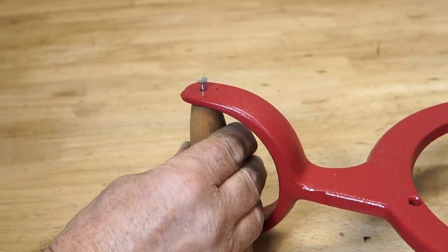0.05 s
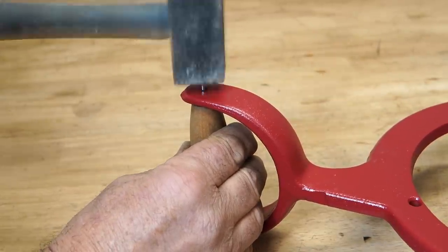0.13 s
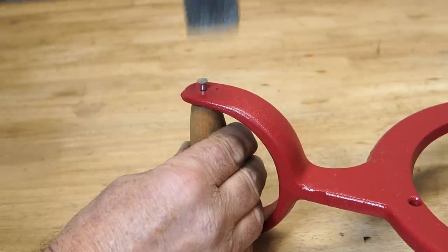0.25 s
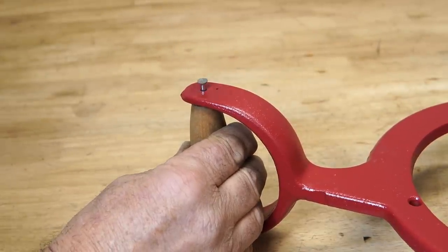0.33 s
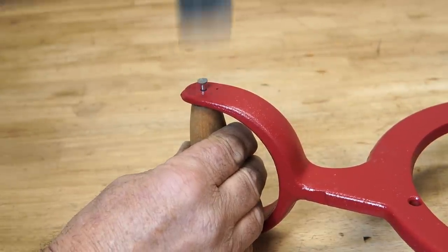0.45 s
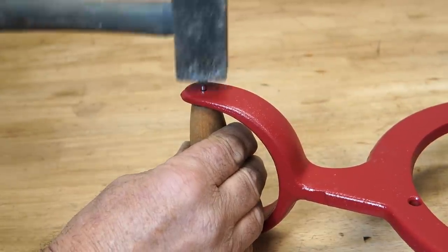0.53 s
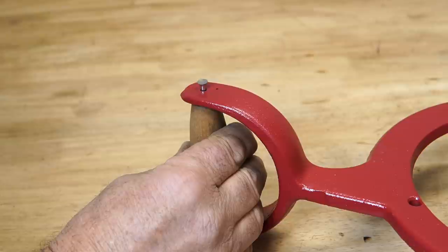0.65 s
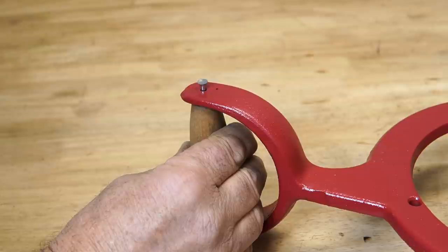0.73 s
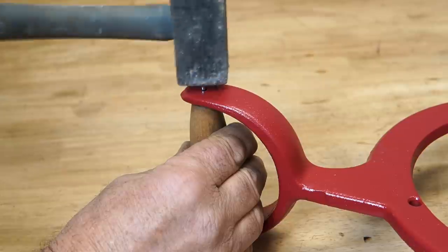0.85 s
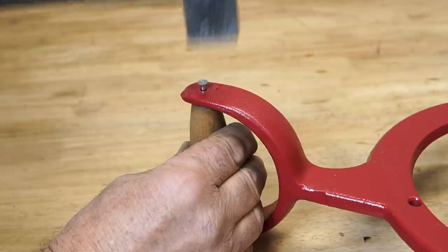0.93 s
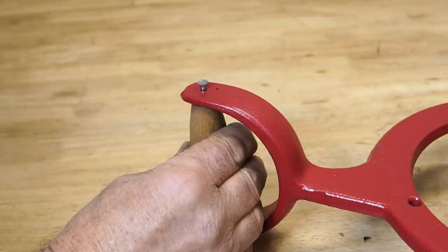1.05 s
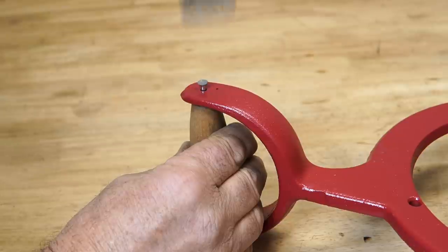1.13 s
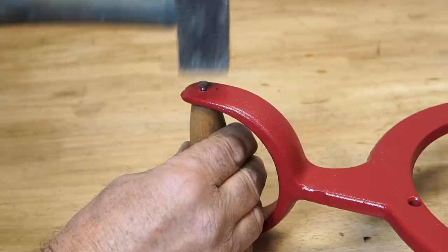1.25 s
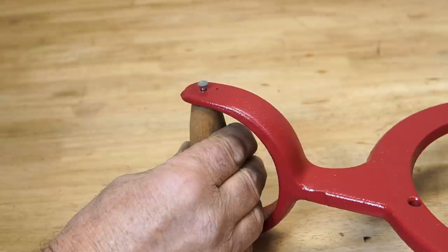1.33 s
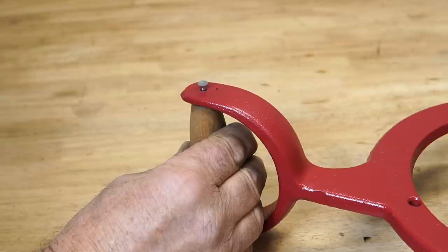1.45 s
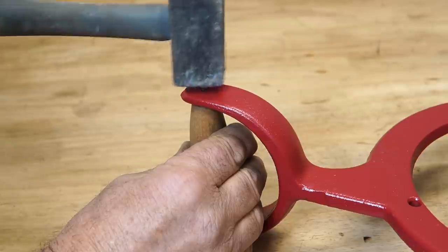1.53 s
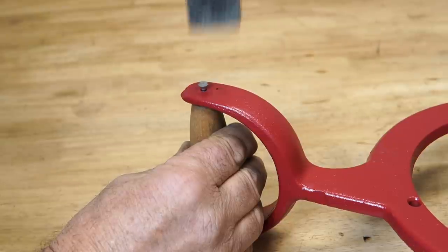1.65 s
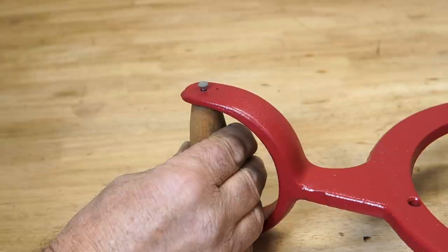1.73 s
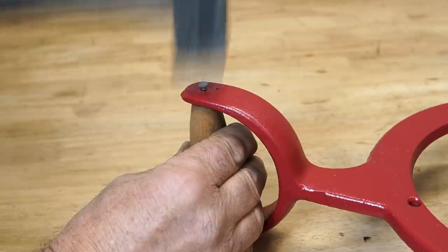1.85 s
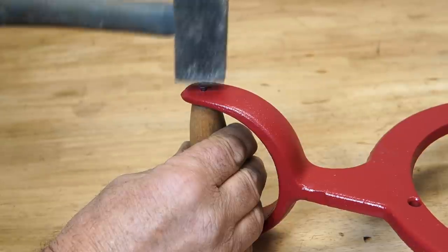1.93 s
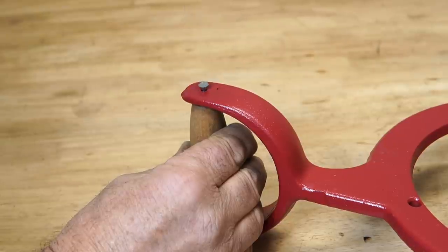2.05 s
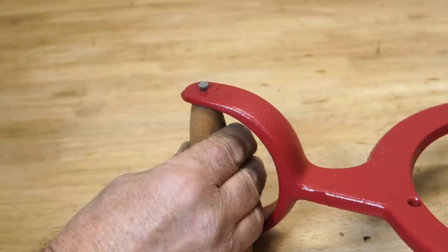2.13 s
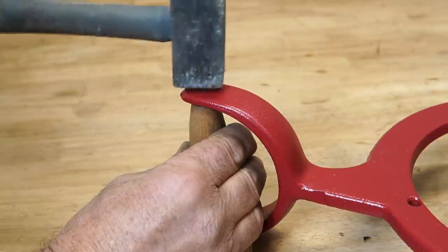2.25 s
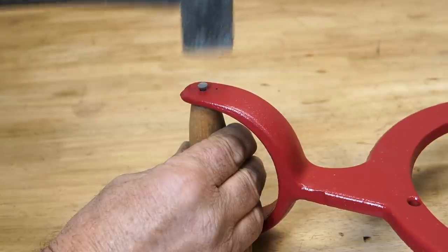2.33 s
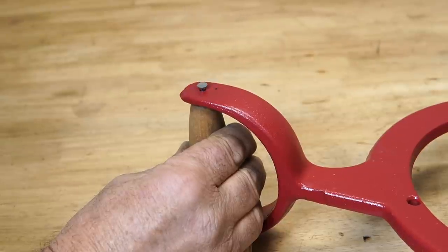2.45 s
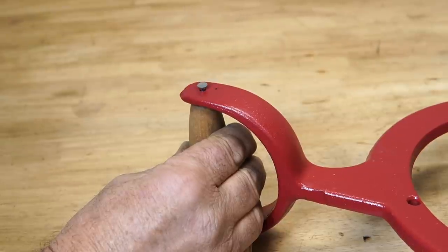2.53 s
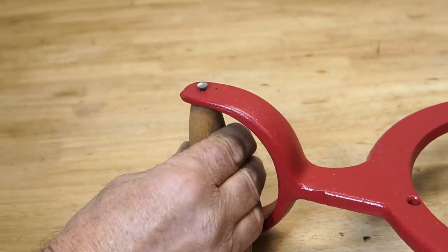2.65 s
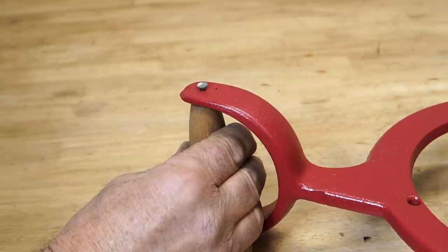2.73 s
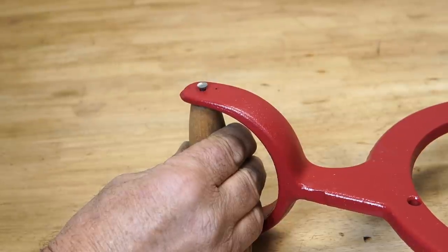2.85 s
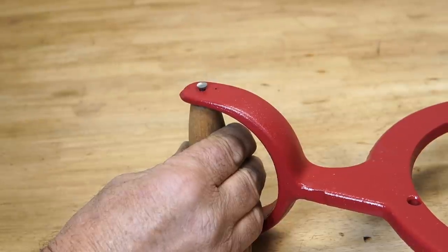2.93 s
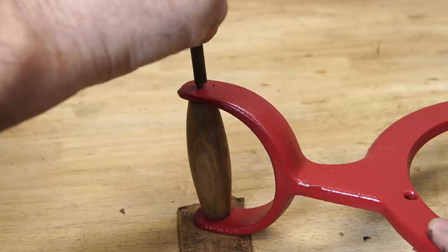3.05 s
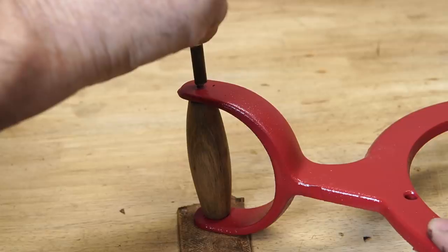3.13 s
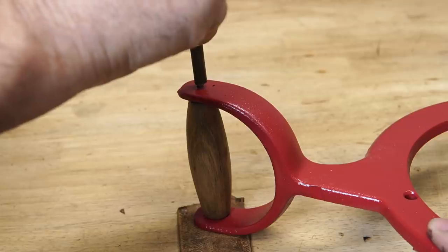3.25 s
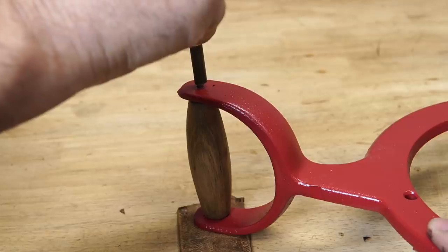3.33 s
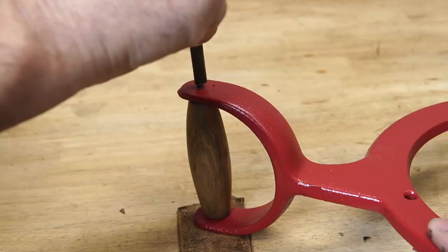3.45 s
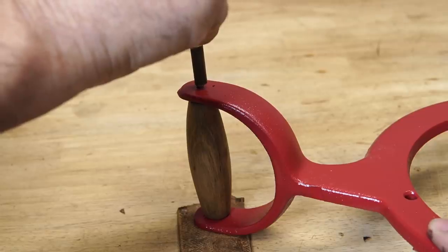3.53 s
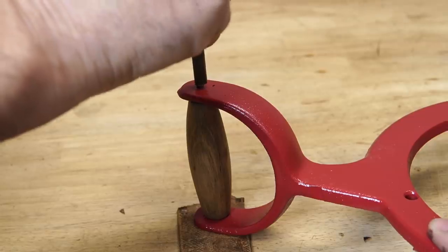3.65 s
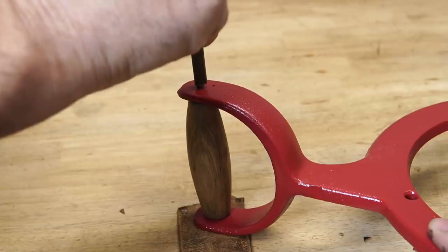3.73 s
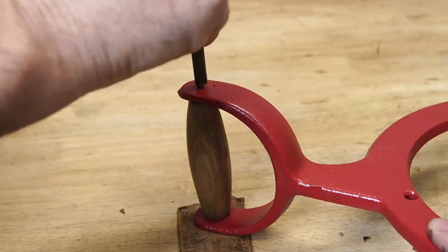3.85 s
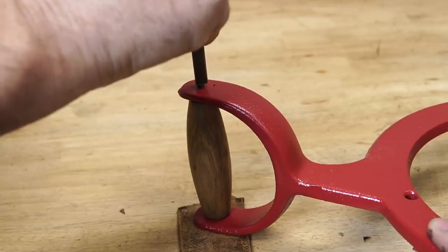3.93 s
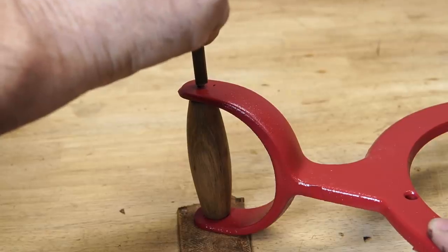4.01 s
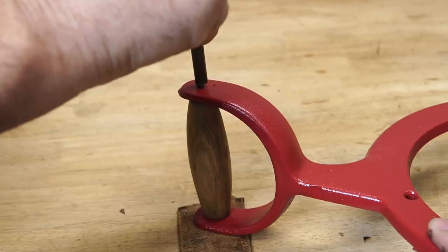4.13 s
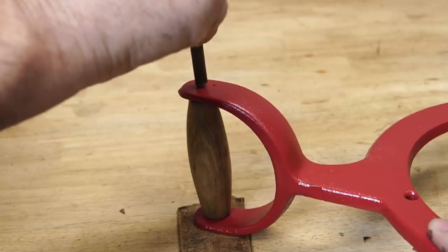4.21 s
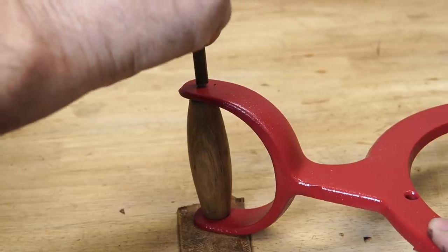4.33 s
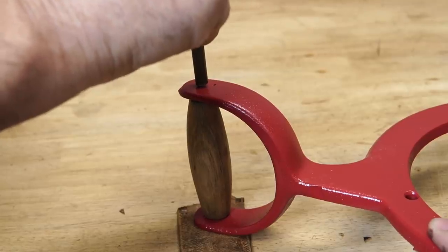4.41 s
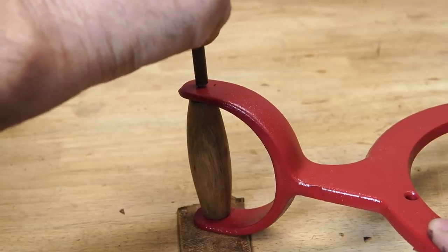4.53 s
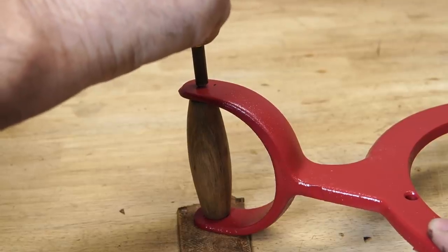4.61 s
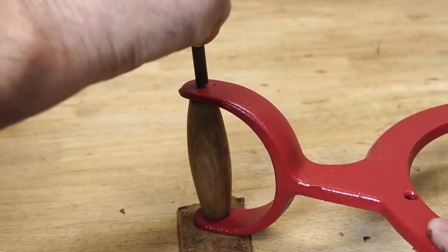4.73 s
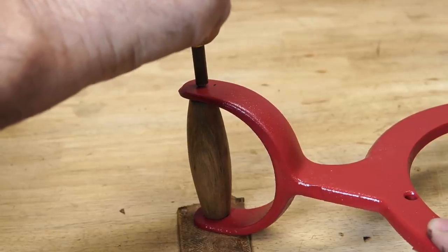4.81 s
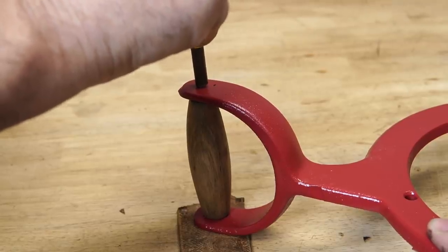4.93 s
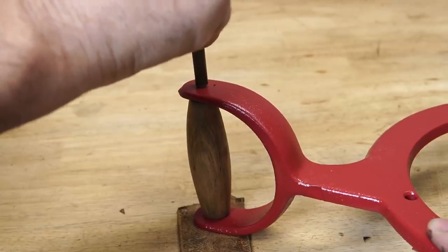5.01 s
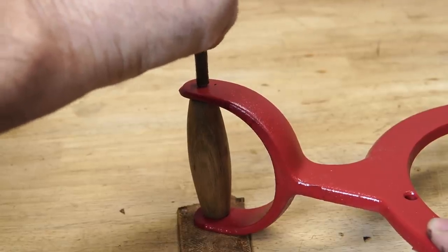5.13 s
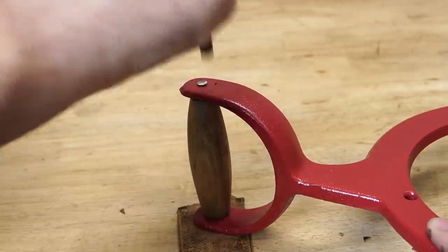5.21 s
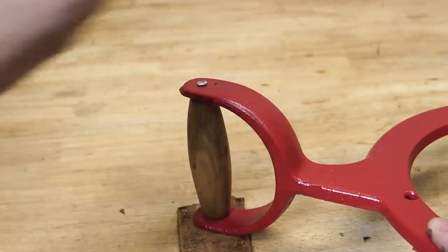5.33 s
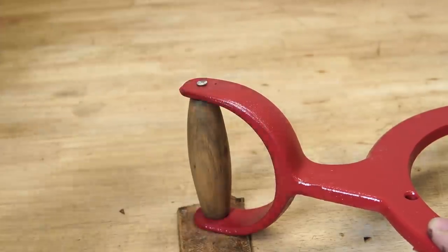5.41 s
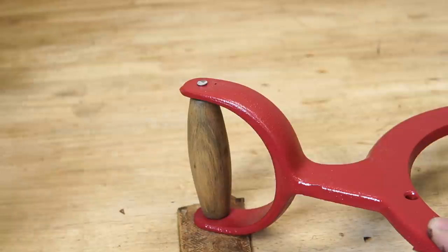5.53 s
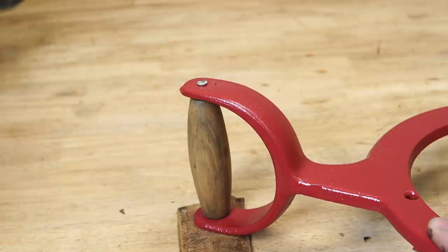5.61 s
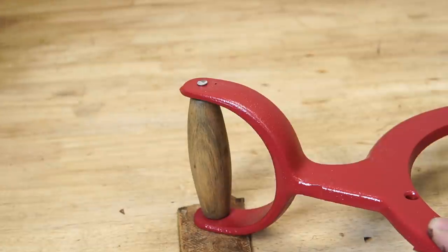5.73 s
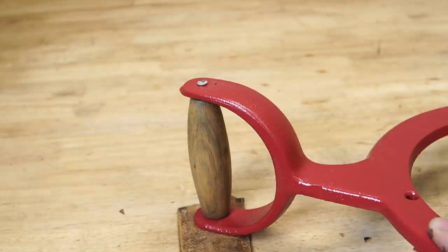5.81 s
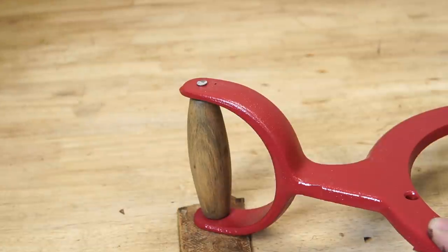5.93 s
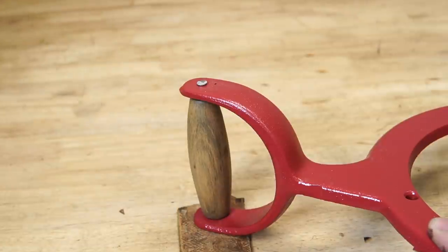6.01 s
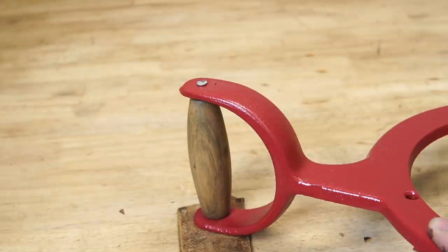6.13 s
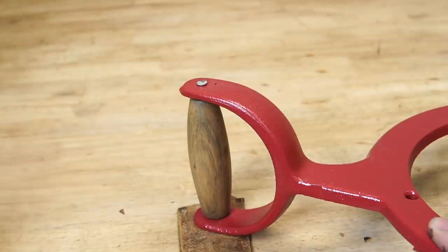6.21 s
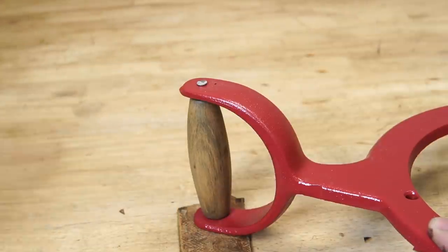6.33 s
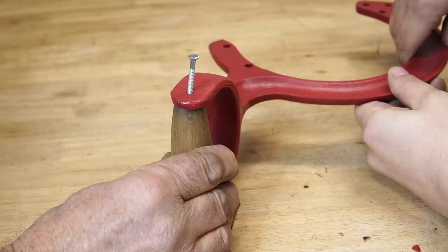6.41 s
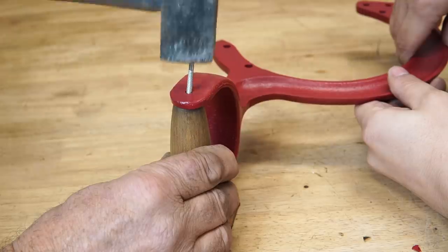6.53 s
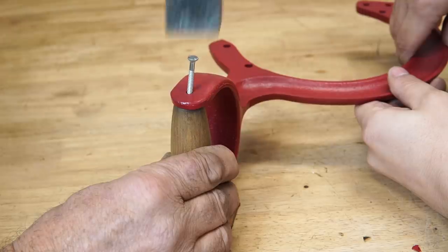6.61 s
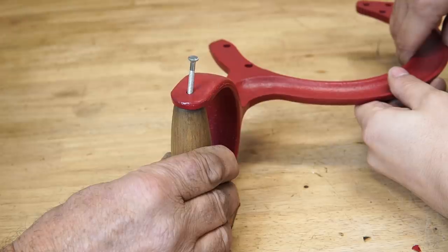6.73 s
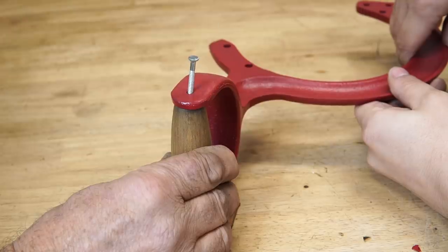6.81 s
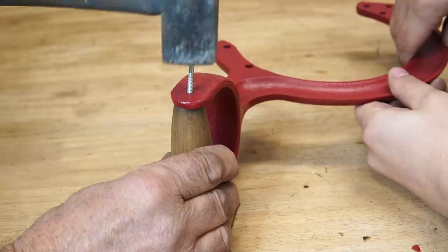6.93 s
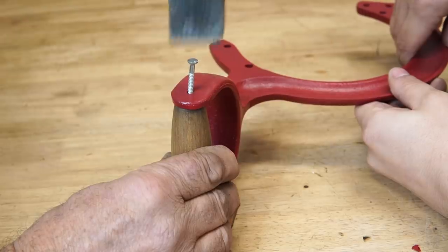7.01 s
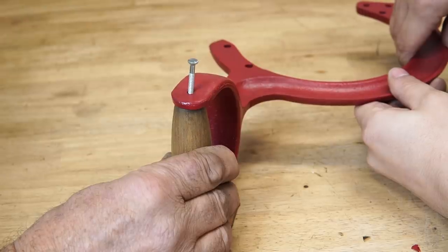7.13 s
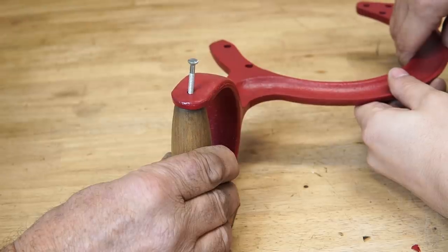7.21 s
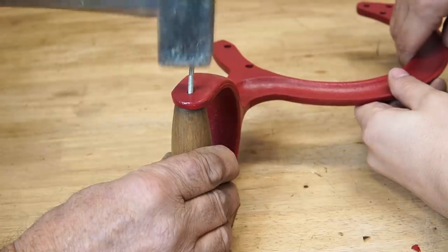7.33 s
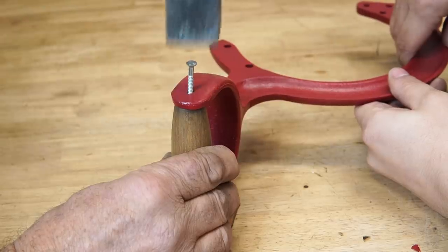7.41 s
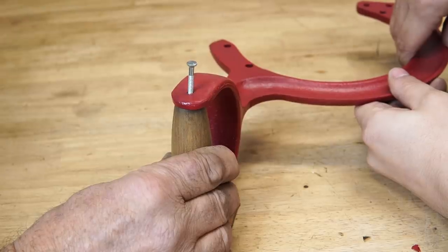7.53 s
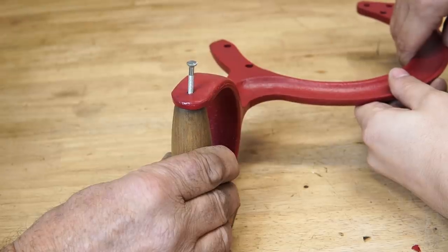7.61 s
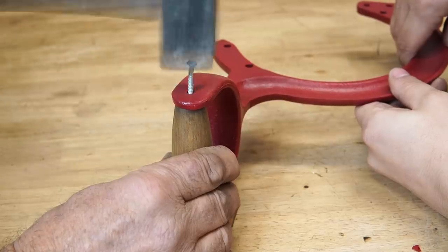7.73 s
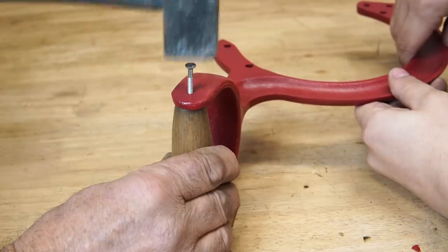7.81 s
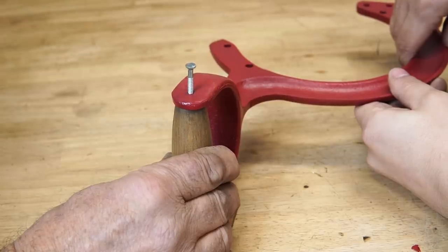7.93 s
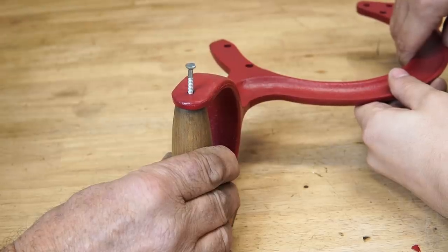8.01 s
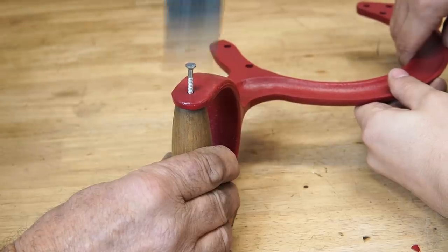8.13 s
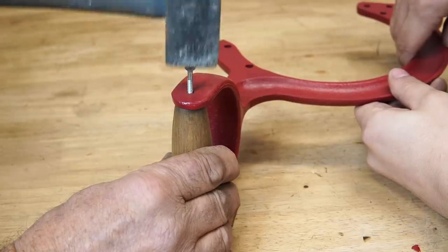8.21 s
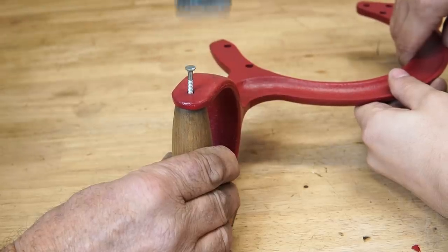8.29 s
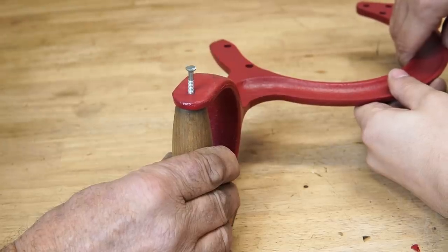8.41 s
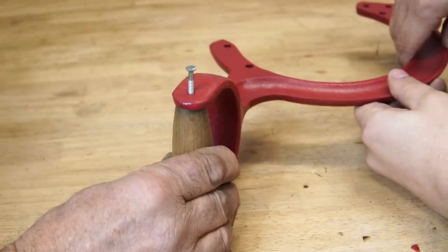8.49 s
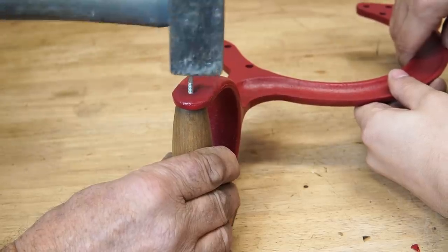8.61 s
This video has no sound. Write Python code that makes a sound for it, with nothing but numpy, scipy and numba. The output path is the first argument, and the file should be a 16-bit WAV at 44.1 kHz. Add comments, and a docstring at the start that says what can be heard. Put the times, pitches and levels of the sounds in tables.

```python
"""In a bare, echoing workshop, a hammer drives pins into a cast handle on a wooden bench.
First come blows on a pin, then heavy blows and light taps through a punch and knocks of the handle
on the bench, then blows on a second pin. Each of these three parts opens in an earlier blow's echo.
Every hit cracks, sets the pieces ringing and echoes; a fast compressor squashes the loud starts."""
import sys
import numpy as np
from scipy import signal
from scipy.fft import rfft, irfft, next_fast_len
from scipy.io import wavfile
from scipy.ndimage import uniform_filter1d, minimum_filter1d
from numba import njit

SR = 44100
rng = np.random.default_rng(int(sys.argv[2]) if len(sys.argv) > 2 else 0)


def transcribe(u):
    """Save the signal u as a 16-bit wav file named by the first command-line argument.

    u: samples, shape (n,) or (channels, n), limited to [-1, 1]; the rate is SR.
    q: integer samples, one column per channel.
    """
    v = np.clip(np.atleast_2d(u).T, -1, 1)
    q = np.round(v * 32767).astype(np.int16)
    wavfile.write(sys.argv[1], SR, q)


N = 381906
SPAN = 2 ** 16  # samples in one blow with its echo
HZ = np.fft.rfftfreq(SPAN, 1 / SR)


def amp(db):
    return 10 ** (np.asarray(db) / 20)


def unit(spectrum):
    return spectrum / np.sqrt(np.mean(np.abs(spectrum) ** 2))


def along(points, hz):
    """Join (pitch_hz, value) points into a curve, on a log pitch axis."""
    f, v = np.transpose(points)
    return np.interp(np.log(hz + 1), np.log(f + 1), v)


def causal(gain):
    """Turn a tone curve into a response that starts at once and rings after."""
    cepstrum = irfft(np.log(gain + 1e-7))
    cepstrum[1:SPAN // 2] *= 2
    cepstrum[SPAN // 2 + 1:] = 0
    return np.exp(rfft(cepstrum))


# how alike left and right sound: pitch_hz, likeness (0-1)
LIKENESS = [(60, .9995), (290, 1), (640, 0.896), (1410, 0.75), (3100, 0.6), (6820, 0.067), (15000, 0.51)]

def spread(pair, hz):
    """Blend two unrelated spectra into left and right."""
    turn = np.arccos(np.clip(along(LIKENESS, hz), 0, 1)) / 2
    mid, side = pair[0] * np.cos(turn), pair[1] * np.sin(turn)
    return np.array([mid + side, mid - side])


# tone of the quiet room: pitch_hz, level_db
RUMBLE = [(18, -27), (30, -3), (82, 0), (392, -9), (1790, -16.5), (8000, -59.5), (17600, -120)]

def room_rumble():
    """The faint, steady rumble of the room."""
    hz = np.fft.rfftfreq(N, 1 / SR)
    spectra = rfft(rng.standard_normal((2, N))) * amp(along(RUMBLE, hz))
    noise = irfft(spread(spectra, hz), N)
    return amp(-57) * noise / np.std(noise)


# time the echo takes to fall 60 dB: pitch_hz, fade_s
ECHO_FADE = [(60, 0.51), (160, 0.99), (420, 0.98), (1100, 0.92), (2900, 1.042), (7700, 0.62), (14000, 0.32)]
# the echo comes in within 8 ms, dips slightly near 30 ms, then evens out: delay_s, level_db
ECHO_RISE = [(0, -23.5), (.008, 1), (.03, -2.5), (.065, -0.5), (.12, 0.5), (.17, 0)]
# low notes the room booms at (standing waves): pitch_hz, width_hz, level_db
ROOM_NOTES = [(71.5, 0.9, 1.5), (82.05, 2.9, 12), (99.5, 1.9, 7), (208.5, 7.6, 9), (264.4, 6.4, 0),
              (325.9, 8, 1.5), (376.3, 3.7, 2.5), (399.5, 6.9, 1.5)]

def echo(returns):
    """The room's echo builds up, then each pitch dies away at its own speed."""
    def band(pitch, width):
        return 1j * HZ * width / (pitch ** 2 - HZ ** 2 + 1j * HZ * width)

    hz, t, noise = signal.stft(rng.standard_normal((2, SPAN)), SR, nperseg=256)
    fall = amp(-60 * t / along(ECHO_FADE, hz)[:, None])
    fall /= np.sqrt(np.sum(fall ** 2, axis=1, keepdims=True))
    # long waves bend round the furniture and fill the room about twice as fast
    sooner = 1 + 1 / (1 + (hz[:, None] / 600) ** 4)
    rise = amp(np.interp(t * sooner, *np.transpose(ECHO_RISE)))
    tail = signal.istft(noise * fall * rise, SR, nperseg=256)[1][:, :SPAN]
    wash = spread(rfft(tail / np.linalg.norm(tail[0])), HZ)
    bass_cut = 1j * HZ / (130 + 1j * HZ)
    boom = sum(amp(db) * band(pitch, width) for pitch, width, db in ROOM_NOTES)
    swells = sum(amp(db) * band(pitch, width) ** 2 * np.exp(-2j * np.pi * HZ * delay_s)
                 for delay_s, pitch, width, db in returns)
    return wash * bass_cut + boom + swells


def crack(tone, level_db, fade_s, click_db):
    """A sharp click, then the piece rattles briefly against bench and hand."""
    t = np.arange(SR // 20) / SR
    rattle = rng.standard_normal((2, len(t))) * amp(-60 * t / fade_s)
    rattle[0, 0] = amp(click_db)
    rattle[0, round(.0034 * SR)] = amp(click_db - 6)  # the click bounces off the bench top
    sound = unit(spread(rfft(rattle, SPAN), HZ / 3)) * causal(unit(amp(along(tone, HZ))))
    lean_right_db = np.array([[-1.5], [1.5]]) * np.minimum(1, HZ / 3000)
    return sound * amp(level_db + lean_right_db)


# notes of the steel hammer head: pitch_hz, width_hz, level_db
HAMMER_NOTES = [(4900, 130, -4), (5650, 38, -1), (6080, 32, -5), (6520, 100, -4), (7000, 44, 1),
                (7800, 65, -6)]
# part of the echo that changes from blow to blow: pitch_hz, share (0-1)
ECHO_CHANGE = [(1500, 0.01), (6000, 0.07)]

def strike(hits, touch, notes, body, crack_tone, room, spare, body_db, crack_db, rattle_s, ping=None):
    """Hits on one spot: each cracks, rings the pieces and wakes nearly the same echo."""
    thump_db, click_db, direct_db, hammer_db = touch
    notes = notes + [(hz, width, db + hammer_db) for hz, width, db in HAMMER_NOTES]
    peaks = np.array([amp(2 * db) / (1 + (2 * (HZ - hz) / width) ** 2)
                      * np.minimum(1, (2 * hz / (HZ + 1)) ** 4) for hz, width, db in notes])
    is_steel = np.array([hz > 4500 for hz, width, db in notes])
    broad = amp(2 * (along(body, HZ) + body_db))
    scale = np.sqrt(np.mean(broad + peaks.sum(axis=0)))
    # the hammer head faces the listener, so its direct ring is 14 dB stronger
    ring = causal(np.sqrt(amp(2 * 14 * is_steel) @ peaks) / scale)
    direct = crack(crack_tone, crack_db, rattle_s, click_db) + amp(direct_db) * ring
    share = along(ECHO_CHANGE, HZ)
    octave = np.log2(HZ + 1)
    treble_octaves = np.clip(octave - np.log2(4000), 0, 2)  # harder contact lifts these
    clang_band = np.exp(-((octave - np.log2(3300)) / 0.53) ** 2)
    bass_db = thump_db / (1 + (HZ / 500) ** 2)
    fade = np.clip(np.linspace(8, -1, SPAN), 0, 1)
    out = np.zeros((2, N + SR + SPAN))  # one extra second in front for early hits
    scatter_db = 1.2 * rng.standard_normal((len(hits), len(notes)))  # no two hits land alike
    angles = np.pi * rng.uniform(-1, 1, len(hits))
    for k, (start_s, level_db, treble_db, steel_db, clang_db) in enumerate(hits):
        contact = causal(amp(treble_db * treble_octaves + bass_db + clang_db * clang_band))
        fresh = np.cos(angles[k]) * spare[0] + np.sin(angles[k]) * spare[1]
        answer = np.sqrt(1 - share) * room + np.sqrt(share) * fresh
        ringing = amp(2 * (scatter_db[k] + steel_db * is_steel)) @ peaks
        if ping:
            hz, width, ping_db, ratio = ping
            ringing += amp(2 * (ping_db + steel_db)) / (1 + (2 * (HZ - hz * ratio ** k) / width) ** 2)
        echoed = causal(np.sqrt(broad + ringing) / scale) * answer
        at = round((start_s + 1) * SR)
        out[:, at:at + SPAN] += amp(level_db + 30.5) * irfft(contact * (echoed + direct)) * fade
    return out[:, SR:SR + N]


# knocks: start_s, level_db, treble_db_per_octave, steel_db, clang_db
KNOCK_HITS = [(5.8516, -16.5, -2, 0, -22), (5.8622, -20.5, -0.5, 0, -12), (6.1473, -16, 5, 0, 8),
              (6.1855, -23.5, 7.5, 0, -4.5)]
# how a knock lands: thump_db, click_db, direct_ring_db, hammer_db
KNOCK_TOUCH = (-2.7, 25, -32, -87)
# ringing notes: pitch_hz, width_hz, level_db
KNOCK_NOTES = [(342, 300, 3.5), (753, 30, 2), (1083, 29, -1), (1430, 37, -7)]
# tone of the body and of the crack: pitch_hz, level_db
KNOCK_BODY = [(18, -66), (30, -46.5), (74, -10), (138, -13), (1130, -3), (2310, -16), (3550, -53),
              (9000, -89.5), (11700, -120)]
KNOCK_CRACK = [(400, -22), (850, 5), (1050, -4.5), (1350, 1.5), (2300, -17.5), (3600, -57), (9000, -102)]

def bench_knocks(room, spare):
    """The handle knocks dully on the wooden bench."""
    return strike(KNOCK_HITS, KNOCK_TOUCH, KNOCK_NOTES, KNOCK_BODY, KNOCK_CRACK, room, spare,
                  body_db=-2, crack_db=-3, rattle_s=0.2)


# taps: start_s, level_db, treble_db_per_octave, steel_db, clang_db
TAP_HITS = [(2.75, -10.5, 5.4, -8, 0), (3.1232, -9, 1.3, 7.5, 0), (3.8609, -10.5, 2, 8, 0),
            (4.552, -11.5, 2.3, -10, 0)]
# how a tap lands: thump_db, click_db, direct_ring_db, hammer_db
TAP_TOUCH = (0, 6, -13.5, -32)
# ringing notes: pitch_hz, width_hz, level_db
TAP_NOTES = [(351, 81, 0.5), (658, 37, 0.5), (1030, 26, -12.5), (3000, 420, -14.5), (3280, 51, -11.5),
             (4240, 39, -16)]
# tone of the body and of the crack: pitch_hz, level_db
TAP_BODY = [(18, -45), (30, -3), (72, -3.5), (358, -10), (640, -19), (902, -18.5), (3290, -22),
            (6190, -26.5), (15200, -59), (16400, -74.5)]
TAP_CRACK = [(180, -14), (300, -0.5), (1510, -5), (2930, -0.5), (5080, -3), (16000, -34.5)]

def punch_taps(room, spare):
    """Light taps seat the punch, a steel rod held on the pin."""
    return strike(TAP_HITS, TAP_TOUCH, TAP_NOTES, TAP_BODY, TAP_CRACK, room, spare,
                  body_db=-1.3, crack_db=-6, rattle_s=0.03)


# blows: start_s, level_db, treble_db_per_octave, steel_db, clang_db
PUNCH_HITS = [(3.5666, -2, 2.8, -1.6, 2.5), (4.2679, -3.5, 1.9, 0, 2), (4.9506, -5.5, 0.96, 1.1, -1)]
# how a blow lands: thump_db, click_db, direct_ring_db, hammer_db
PUNCH_TOUCH = (1.6, 10, -17, -22.5)
# ringing notes: pitch_hz, width_hz, level_db
PUNCH_NOTES = [(374, 50, 1.5), (634, 19, -8.5), (790, 52, -5.5), (1068, 170, -6.5), (1516, 140, -9.5),
               (3217, 100, -14.5), (4060, 140, -15.5)]
# tone of the body and of the crack: pitch_hz, level_db
PUNCH_BODY = [(18, -43.5), (30, -5), (70, -4), (241, -6), (368, -24), (607, -34), (1570, -11), (4170, -23),
              (15200, -46), (16400, -84.5)]
PUNCH_CRACK = [(180, -43), (300, -11), (749, -19), (1460, 4), (1900, 4), (5800, -11), (16000, -31.5)]

def punch_blows(room, spare):
    """Heavy blows pass through the punch and thump the bench."""
    return strike(PUNCH_HITS, PUNCH_TOUCH, PUNCH_NOTES, PUNCH_BODY, PUNCH_CRACK, room, spare,
                  body_db=-0.75, crack_db=-8, rattle_s=0.019)


# blows: start_s, level_db, treble_db_per_octave, steel_db, clang_db
PIN_HITS = [(-.167, -11, 2, -3, -5.5), (.1796, -9.5, -1, -2, -5.5), (.5268, -9, -0.2, 0.5, -5),
            (.8686, -9.5, 0.5, 1.5, -3.5), (1.2167, -10, -1, 2, -4.5), (1.5701, -10, 2.5, -4, -2.5),
            (1.9145, -10, 2.5, -9, -3), (2.2581, -11, 3.5, 4.5, -5.5)]
# how a blow lands: thump_db, click_db, direct_ring_db, hammer_db
PIN_TOUCH = (-3, 15, -12.5, -33.5)
# ringing notes: pitch_hz, width_hz, level_db
PIN_NOTES = [(359, 17, -8), (642, 6.5, -11.5), (1097, 76, -13), (1567, 127, -16), (2240, 180, -19)]
# tone of the body and of the crack: pitch_hz, level_db
PIN_BODY = [(18, -62), (30, -22), (80, -10), (314, -10.5), (378, -3), (532, -18.5), (1110, -23),
            (2880, -20), (4630, -39.5), (7900, -45), (10500, -61), (14800, -71), (16400, -84.5)]
PIN_CRACK = [(120, 0), (821, -11.5), (1400, 6), (1800, -5), (2400, 7), (4490, -17), (7040, -18.5),
             (16000, -59.5)]

def first_pin(room, spare):
    """Even blows drive the first pin into the handle."""
    return strike(PIN_HITS, PIN_TOUCH, PIN_NOTES, PIN_BODY, PIN_CRACK, room, spare,
                  body_db=0, crack_db=-4.5, rattle_s=0.03)


# blows: start_s, level_db, treble_db_per_octave, steel_db, clang_db
SECOND_HITS = [(6.18, -7.5, 2.9, -10, -5), (6.5757, -5.5, 0.85, -14.5, -5), (6.9687, -5, 2.9, 1, -0.5),
               (7.3782, -5, 4.4, -3, 0), (7.7823, -6, 5.9, -14.5, 3), (8.194, -7, 5.1, -1, 8),
               (8.6072, -4.5, 6.1, 0, 10)]
# how a blow lands: thump_db, click_db, direct_ring_db, hammer_db
SECOND_TOUCH = (2.2, 12, -15, -50.5)
# ringing notes: pitch_hz, width_hz, level_db
SECOND_NOTES = [(477, 43, -3), (653, 41, -0.5), (1055, 233, -4), (1402, 33, -1.5), (1830, 11, -3)]
# tone of the body and of the crack: pitch_hz, level_db
SECOND_BODY = [(18, -47), (30, -2), (82, -0.5), (190, 1), (479, -15), (561, -49), (1790, 1.5), (2300, -14),
               (3500, -26.5), (4300, -36), (9500, -42.5), (16400, -98)]
SECOND_CRACK = [(88, -34), (150, -33.5), (790, -5.5), (1480, 9), (4580, -29), (6260, -27), (16000, -47.5)]
# ping of the pin's free end: first_pitch_hz, width_hz, level_db, pitch_ratio_per_blow
PING = (5200, 300, -33, 1.065)

def second_pin(room, spare):
    """The second pin's free end pings higher as each blow shortens it."""
    return strike(SECOND_HITS, SECOND_TOUCH, SECOND_NOTES, SECOND_BODY, SECOND_CRACK, room, spare,
                  body_db=-4, crack_db=-7.5, rattle_s=0.035, ping=PING)


# late swells sent back by the walls: delay_s, pitch_hz, width_hz, level_db
WALL_SWELLS = [(.04, 372, 32, 1.5), (.134, 1790, 55, 0)]
# when each part of the work begins: start_s
PART_STARTS = [0, 3.008, 6.448]

def scene():
    """Three parts, each at its own spot in the room and ending where the next begins."""
    pin_room, punch_room = echo(WALL_SWELLS[:1]), echo(WALL_SWELLS[:1])
    bench_room, second_room = echo([]), echo(WALL_SWELLS)
    spare = echo([]), echo([])  # blended in to vary each hit's echo
    parts = [first_pin(pin_room, spare),
             punch_blows(punch_room, spare) + punch_taps(punch_room, spare)
             + bench_knocks(bench_room, spare),
             second_pin(second_room, spare)]
    t = np.arange(N) / SR
    opened = [np.clip((t - start_s) / fade_s, 0, 1)
              for start_s, fade_s in zip(PART_STARTS, (.001, .001, .004))] + [0]
    work = sum(part * opened[k] * (opened[k + 1] == 0) for k, part in enumerate(parts))
    return work + room_rumble()


@njit
def recover(gain_db, keep):
    """The volume drops at once and creeps back."""
    out = gain_db.copy()
    for n in range(1, len(out)):
        out[n] = min(out[n], out[n - 1] * keep)
    return out


def record(dry):
    """A compressor turns down loud peaks, then the deepest bass and highest treble are cut."""
    ahead = round(.002 * SR)  # it looks 2 ms ahead
    threshold_db, release_s, top_hz = -6, 0.059, 16600
    level_db = 20 * np.log10(np.abs(dry).max(axis=0) + 1e-9)
    need_db = -.8 * np.maximum(level_db - threshold_db, 0)
    need_db = minimum_filter1d(need_db, size=2 * ahead + 1)
    gain_db = uniform_filter1d(recover(need_db, np.exp(-1 / (release_s * SR))), size=ahead)
    cut = signal.sosfilt(signal.butter(2, 36, "high", fs=SR, output="sos"), dry * amp(gain_db))
    size = next_fast_len(N + 4096)
    return irfft(rfft(cut, size) * (np.fft.rfftfreq(size, 1 / SR) < top_hz), size)[:, :N]


dry = scene()
out = record(dry)
transcribe(out)
```